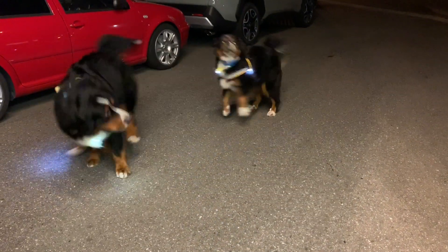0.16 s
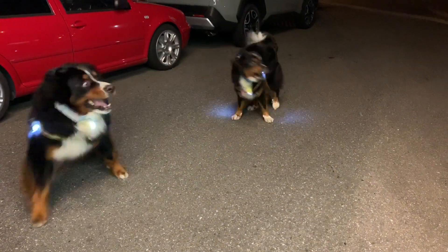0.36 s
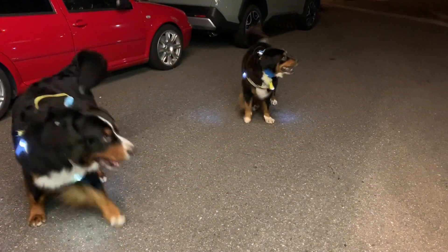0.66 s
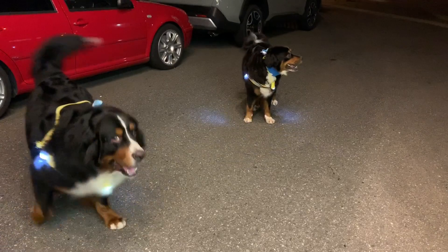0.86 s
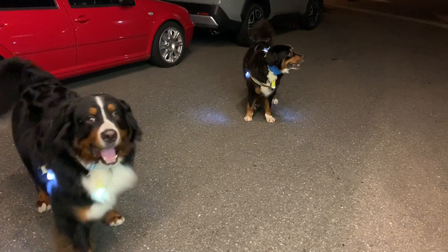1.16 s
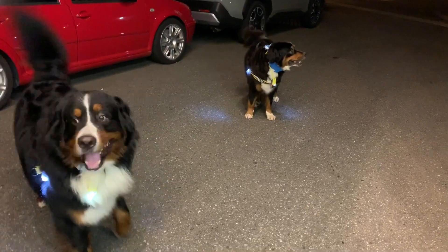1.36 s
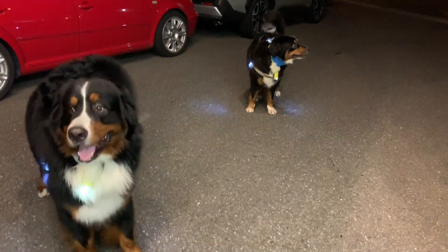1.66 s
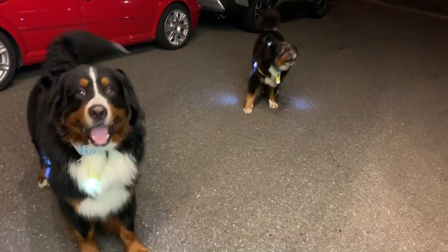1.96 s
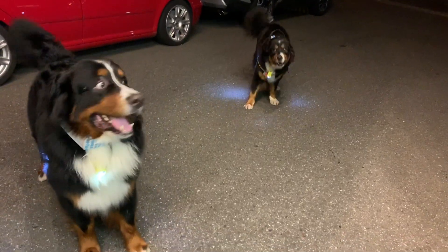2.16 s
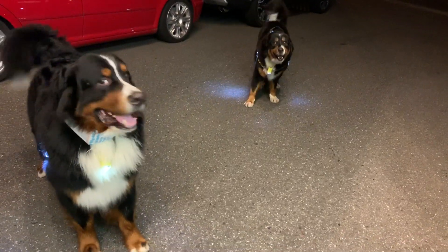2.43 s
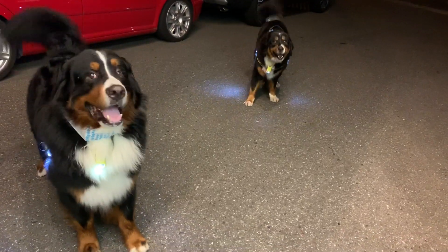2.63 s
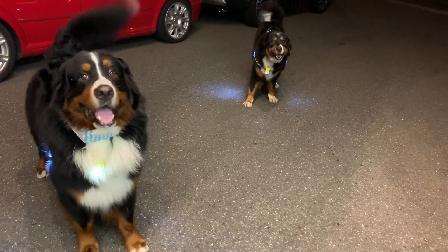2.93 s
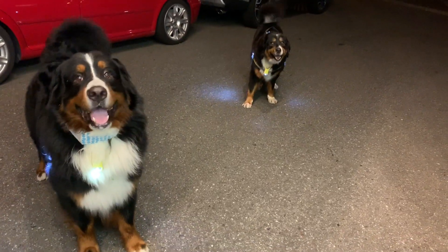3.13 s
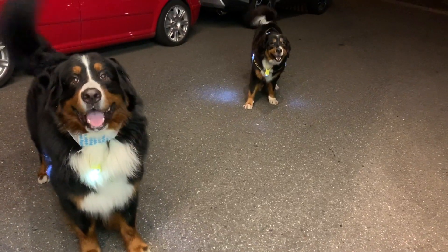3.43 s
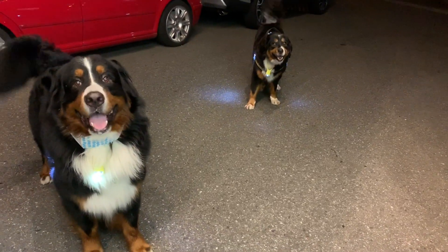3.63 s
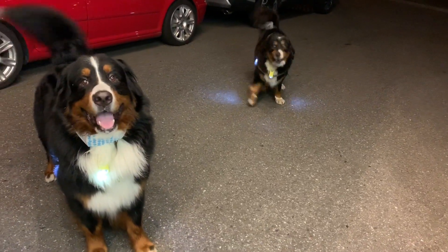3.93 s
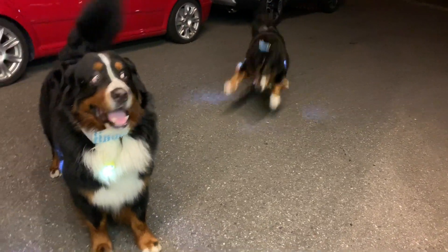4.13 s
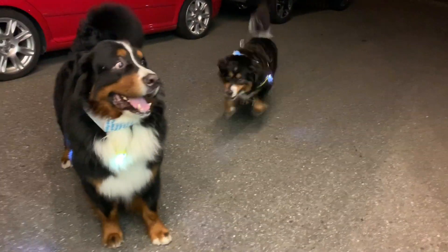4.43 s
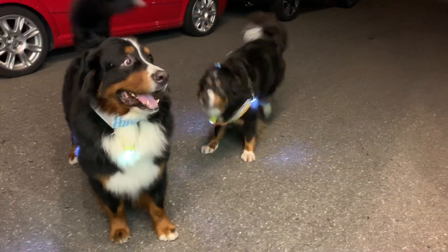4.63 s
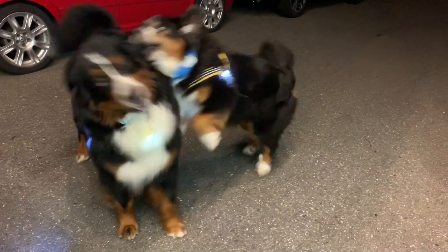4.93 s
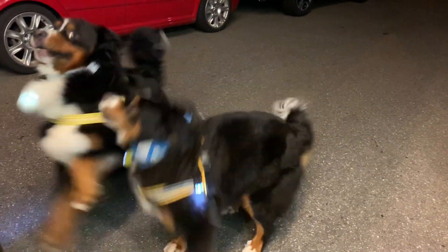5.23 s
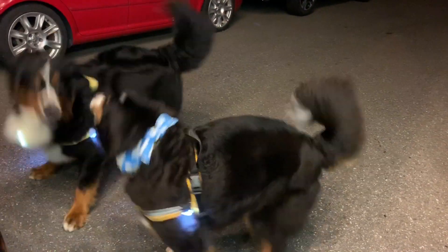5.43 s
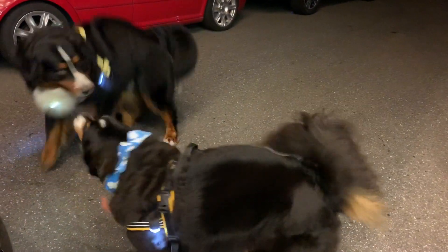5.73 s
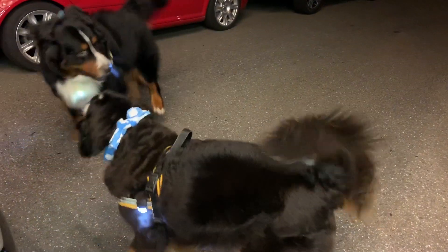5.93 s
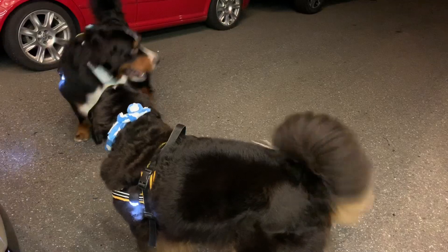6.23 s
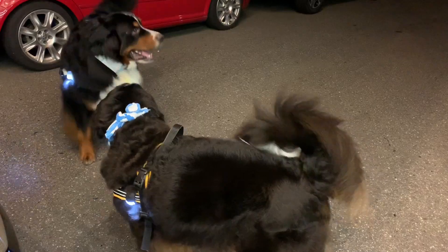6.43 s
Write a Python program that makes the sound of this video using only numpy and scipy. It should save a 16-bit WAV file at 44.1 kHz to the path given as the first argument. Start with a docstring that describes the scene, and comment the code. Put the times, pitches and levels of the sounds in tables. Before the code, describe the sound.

Six rough, abrupt barks from a big dog, close to a stereo microphone on open asphalt. The first two stand alone, with faint collar clinks and breathy puffs between them. Later a playful lunge brings quicker barks, padded landings, claw clicks, broken high whines, hurried panting and grainy rubbing of fur and straps. Each bark slaps off nearby cars and leaves a thin tail over soft traffic rumble.

```python
"""A large dog's six hoarse barks ring out close by, at a playmate in a car park; cars and a far wall answer.
Each bark is two frequency-modulated tones of the vocal folds with noise-filled rasp, shaped by throat and jaw.
Collar tags ring as damped modes, claws and paws strike as decaying noise, and coats and harnesses rub in grains.
Coloured noise makes the panting and the distant traffic; short swept sines make thin whines."""
import sys
import numpy as np
from scipy import signal
from scipy.fft import rfft, irfft, next_fast_len
from scipy.io import wavfile
from scipy.ndimage import uniform_filter1d, minimum_filter1d, map_coordinates

SR = 44100
rng = np.random.default_rng(int(sys.argv[2]) if len(sys.argv) > 2 else 0)


def to_wav(s):
    """Save 16-bit WAV."""
    ch = np.atleast_2d(s).T  # columns
    pcm = np.round(np.clip(ch, -1, 1) * 32767)  # PCM
    wavfile.write(sys.argv[1], SR, pcm.astype(np.int16))


N = 290619

# spectrum of a small hard impact, claw or tag: (frequency [Hz], relative level [dB])
CLAW_SPECTRUM = [(1000, -36.5), (3000, -9.5), (4500, -8.5), (7000, 0), (10000, -18), (14000, -7),
                 (16000, -20.5)]


def amp(db):
    """Level: 20 dB is a tenfold amplitude."""
    return 10 ** (np.asarray(db) / 20)


def unit(x):
    """Normalisation: the root mean square becomes 1."""
    return x / np.sqrt(np.mean(x ** 2) + 1e-20)


def along(points, hz):
    """Logarithmic frequency scale: interpolates (frequency [Hz], value) points."""
    f, v = np.transpose(points)
    return np.interp(np.log(hz + 1), np.log(f + 1), v)


def curves(rows, t):
    """Envelopes: interpolates each column after the time, at the times t."""
    s, *columns = np.transpose(rows)
    return [np.interp(t, s, column) for column in columns]


def wobble(rate, size):
    """Slow random modulation: a smooth curve through rate random knots a second."""
    knots = rng.standard_normal(int(size * rate / SR) + 4)
    return map_coordinates(knots, [np.arange(size) * rate / SR])


def filtered(x, response):
    """Linear filtering: multiplies the spectrum of x by a response of frequency."""
    n = x.shape[-1]
    m = next_fast_len(n + 8192)
    return irfft(rfft(x, m) * response(np.fft.rfftfreq(m, 1 / SR)), m)[..., :n]


def noise(spectrum, size, width=0.83):
    """Spectral colouring: filtered stereo noise of rms 1; width is the ratio of side to mid."""
    mid, side = filtered(rng.standard_normal((2, size)), lambda hz: amp(along(spectrum, hz)))
    return unit(np.array([mid + width * side, mid - width * side]))


def pan(db):
    """Level difference between the channels: left and right gains of constant power."""
    power = (amp(db) + amp(-db)) / 2
    return np.reshape(amp([db / 2, -db / 2]) / np.sqrt(power), (2, -1))


def add(track, s, sound):
    """Superposition: mixes a sound in at s seconds."""
    start = max(round(s * SR), 0)
    part = track[..., start:start + sound.shape[-1]]
    part += sound[..., :part.shape[-1]]


def swells(rows):
    """Amplitude envelope: a rounded swell for each (middle [s], length [s], level [dB]) row."""
    t = np.arange(N) / SR
    return sum(amp(db) * np.exp(-np.abs(2 * (t - s) / length) ** 3) for s, length, db in rows)


def patchy(x):
    """Random gain field: grainy peaks and gaps wander through the noise's spectrum."""
    depth_db = 4.5
    z = signal.stft(x, nperseg=512)[2]
    across_hz = uniform_filter1d(rng.standard_normal(z.shape[1:]), size=3, axis=0)
    field = uniform_filter1d(across_hz, size=5, axis=1)
    return signal.istft(z * amp(depth_db * unit(field)), nperseg=512)[1][:, :x.shape[1]]


def town(rumble_db=3):
    """Broadband noise of many distant sources: traffic rumbles under a faint wash."""
    # rumble level before rumble_db, and wash level: (time [s], level [dB])
    rumble_level = [(0, -40.5), (1.3, -46.5), (2.2, -41.5), (3.2, -42.5), (3.95, -38.5), (4.6, -43),
                    (6.59, -51.5)]
    wash_level = [(0, -47), (1.5, -53.5), (2.6, -51.5), (3.9, -50.5), (5.5, -47), (6.59, -61)]
    # spectra of both: (frequency [Hz], relative level [dB])
    rumble_spectrum = [(12, -40.5), (20, -10.5), (43, 2), (59, -0.5), (72, 0), (108, -10.5), (221, -17.5),
                       (253, -17.5), (300, -28.5), (390, -58.5), (660, -120)]
    wash_spectrum = [(120, -48), (200, -6.5), (451, -9), (494, -6.5), (560, -11), (912, -12), (1690, -21.5),
                     (2550, -24), (5170, -38), (15000, -51.5)]
    t = np.arange(N) / SR
    rumble_gain = amp(curves(rumble_level, t)[0] + rumble_db)
    rumble = rumble_gain * noise(rumble_spectrum, N, width=0.15) * pan(-2.5)
    wash_gain = amp(curves(wash_level, t)[0] + 0.72 * wobble(3, N))
    return rumble + wash_gain * noise(wash_spectrum, N, width=0.82)


def panting():
    """Breath noise through resonances: soft puffs leave a dog's open muzzle."""
    # puffs of breath: (middle [s], length [s], level [dB])
    puffs = [(0.573, 0.095, -41), (0.928, 0.12, -47), (1.271, 0.12, -47.5), (1.635, 0.13, -53),
             (4.806, 0.06, -36.5), (4.929, .07, -33.5), (5.019, 0.12, -35), (5.498, 0.075, -43),
             (5.643, 0.19, -46.5), (6.34, 0.1676, -53.5)]
    # resonances of the open muzzle: (frequency [Hz], relative level [dB])
    muzzle = [(200, -15), (400, 5), (580, -4.5), (800, 2), (970, -4), (1200, 2.5), (1600, -9), (2400, -11),
              (3100, -20), (4000, -25.5), (8000, -41)]
    return swells(puffs) * unit(patchy(noise(muzzle, N, width=0.75)))


def rubbing(grain_db=3, fits_db=3):
    """Friction noise: fur and harness rub in grains, by fits and starts in the tussle."""
    # single rubs, and steady rubbing while the dogs wrestle: (middle [s], length [s], level [dB])
    scuffs = [(.34, 0.16, -48.5), (.53, 0.14, -56), (1.05, 0.078, -59), (4.27, 0.15, -47),
              (4.76, 0.045, -51.5), (5.3, 0.13, -39.5), (5.675, .05, -49), (6.05, 0.27, -59)]
    tussle = [(4.95, 1.31, -51.5)]
    # spectrum of the rubbing: (frequency [Hz], relative level [dB])
    scuff_spectrum = [(1470, -29), (2500, -7), (4240, -5), (5560, -10), (8600, -3), (10500, -26),
                      (12700, -2.5), (16000, -31)]
    strength = swells(scuffs) + swells(tussle) * amp(fits_db * wobble(25, N))
    grains = patchy(noise(scuff_spectrum, N)) * amp(grain_db * wobble(150, N))
    return strength * unit(grains)


def paws(level_db=-7):
    """Soft impact: a yielding pad lands with a brief rise and a low, decaying thud."""
    # landings, before level_db: (time [s], level [dB])
    landings = [(4.285, -22.5), (4.323, -20.5), (4.905, -31), (4.948, -30), (5.027, -28.5), (5.322, -29),
                (5.826, -23)]
    # spectrum of a thud: (frequency [Hz], relative level [dB])
    pad = [(40, -11), (90, -0.5), (200, -9.5), (420, -8), (800, -21), (3000, -49.5)]
    t60_s, rise_s = 0.12, 0.0006
    out, t = np.zeros((2, N)), np.arange(SR // 4) / SR
    for s, db in landings:
        envelope = amp(db + level_db - 60 * t / t60_s) * (1 - np.exp(-t / rise_s))
        add(out, s, envelope * noise(pad, len(t), width=0.19))
    return out


def ticking(level_db=-5):
    """Hard impact: claws and buckles excite abrupt, exponentially decaying noise."""
    # ticks, before level_db: (time [s], level [dB])
    ticks = [(0.4003, -44), (1.6377, -46), (1.726, -49), (4.3959, -29), (4.4485, -35), (4.857, -35),
             (5.0408, -36), (5.454, -29), (6.5141, -50)]
    t60_s = 0.028
    out, t = np.zeros((2, N)), np.arange(SR // 4) / SR
    for s, db in ticks:
        add(out, s, amp(db + level_db - 60 * t / t60_s) * noise(CLAW_SPECTRUM, len(t), width=1.0))
    return out


def tags(level_db=-5.5, click=0.29):
    """Modal vibration: each clink rings the metal tag's damped modes at new strengths."""
    # clinks, before level_db: (time [s], level [dB])
    clinks = [(0.0438, -44), (0.3455, -36.5), (0.3706, -40.5), (0.646, -36), (0.849, -46.5), (0.935, -51),
              (1.336, -49.5), (1.3613, -39.5), (5.965, -49), (6.1826, -40.5)]
    # modes of the tag: (frequency [Hz], mean relative level [dB], decay by 60 dB [s])
    modes = [(6440, -11, 0.17), (7240, -4.5, 0.18), (13240, -10, 0.19), (13400, 3.5, .06), (15710, -19, .1)]
    click_t60_s = 0.011
    out, t = np.zeros((2, N)), np.arange(SR // 2) / SR
    for s, db in clinks:
        ring = 0
        for hz, mode_db, t60 in modes:
            strength_db = mode_db + rng.normal(0, 2, (2, 1))  # drawn for each channel
            ring = ring + amp(strength_db - 60 * t / t60) * np.sin(2 * np.pi * hz * t)
        contact = click * amp(-60 * t / click_t60_s) * noise(CLAW_SPECTRUM, len(t))
        add(out, s, amp(db + level_db) * (ring + contact))
    return out


def whining():
    """Frequency modulation: thin, broken whistles glide and waver as the dog lunges."""
    # whines: (start [s], end [s], first mean pitch [Hz], last mean pitch [Hz], level [dB])
    whines = [(4.451, 4.507, 4350, 4240, -54), (4.525, 4.56, 4200, 4460, -47),
              (4.552, 4.624, 4550, 4780, -43), (4.70, 4.755, 4550, 4180, -46.5),
              (4.764, 4.785, 4250, 4350, -47.5), (4.789, 4.84, 4320, 4170, -47.5),
              (4.886, 4.912, 4130, 4400, -52), (4.897, 5.051, 810, 738, -46.5)]
    waver, flutter_db = .028, 7  # random share of the pitch, random swing of the level
    out = np.zeros((2, N))
    for start, end, first_hz, last_hz, db in whines:
        n = int(max(end - start, .01) * SR)
        hz = np.linspace(first_hz, last_hz, n) * (1 + waver * wobble(300, n))
        swell = unit(np.hanning(n) ** .5 * amp(flutter_db * wobble(100, n)))
        whistle = unit(np.sin(2 * np.pi * np.cumsum(hz) / SR))
        add(out, start, amp(db) * swell * whistle)
    return out


def gesture(row, t):
    """Articulation: the jaw opens and shuts, bending pitch and level, and the voice catches once."""
    (start, length, attack, closing_s, low_hz, high_hz, high_fall, low_db, high_db, rasp_db,
     drift_db, surge_s, period_s, catch_s, catch_db) = row
    low_scoop, high_scoop, low_fall = .25, .17, .16  # shares of pitch: missing at the start, lost at the end
    # climb of the attack, loss as the jaw shuts, dying after the end
    onset_db, closing_db, release_db_per_s = 33.5, 5, 1499
    rasp_open_db = 1.5  # an open mouth lets out more rasp
    low_surge_db, high_surge_db = 3.5, 2.5  # the two tones trade strength to and fro
    catch_width_s = 0.0061  # from the catch's middle to 1/e of its depth
    grunt_db, grunt_s = -23, 0.024  # gain over the rasp's base level, time of its crest
    jaw_lag = 2.1  # opening time in attack times
    age = t - start
    opening = np.clip(1 - age / (jaw_lag * attack), 0, 1) ** 2  # 1 at the start, 0 once open
    closing = np.clip(1 + (age - length) / closing_s, 0, 1)
    shut = closing ** 2
    catch = np.exp(-((age - catch_s) / catch_width_s) ** 2)
    effort_db = (-onset_db * np.clip(1 - age / attack, 0, 1) ** 1.36 - closing_db * shut
                 - catch_db * catch - release_db_per_s * np.maximum(age - length, 0))
    surge = np.cos(2 * np.pi * (age - surge_s) / period_s)
    drift = drift_db * (2 * np.clip(age / length, 0, 1) - 1)
    slack = np.sin(np.pi / 2 * np.clip(age / grunt_s, 0, 2)) + .5 * catch
    return (low_hz * (1 - low_scoop * opening - low_fall * shut),
            high_hz * (1 - high_scoop * opening - high_fall * np.sin(np.pi / 2 * closing) ** 2),
            low_db + effort_db - drift + low_surge_db * surge,
            high_db + effort_db + drift - high_surge_db * surge,
            rasp_db + effort_db - rasp_open_db * (opening + shut),
            amp(rasp_db + grunt_db) * slack)


def fold(hz, rough):
    """Jitter and shimmer: roughness shakes a fold mode's period and swing; gives phase and swing."""
    n, jitter, shimmer_db = len(hz), .055, 4.5
    phase = 2 * np.pi * np.cumsum(hz * (1 + jitter * rough * wobble(324.5, n))) / SR
    return phase, unit(amp(shimmer_db * rough * wobble(210, n)))


def warped(x, stretch):
    """Time scaling: playing x at a changing speed moves its resonances."""
    at = np.cumsum(stretch / np.mean(stretch)) - 1
    return np.array([map_coordinates(row, [at], order=5, mode="mirror") for row in np.atleast_2d(x)])


def bark(row, throat, roughness, delivery, tone_db=-3.0, rasp_db=-1, rasp_low_db=-10, lumps_db=2,
         jaw=.75, overtone_db=-3.5):
    """Nonlinear phonation: two fold modes collide into sum tones and chop the breath into a rasp."""
    # bright hiss that follows each bark's level: (frequency [Hz], relative level [dB])
    hiss_spectrum = [(3000, -42.5), (4100, -42.5), (4700, 1.5), (5200, -10.5), (5900, -7.5), (7500, -4.5),
                     (9200, -11.5), (10500, -41), (13300, -5.5), (16000, -33.5)]
    # level difference of the hiss: (frequency [Hz], left over right [dB])
    hiss_pan = [(4000, 2), (5500, -7.5), (8000, 1), (11000, 0.2)]
    # phase difference between the two channels, before each bark's scale: (frequency [Hz], phase [rad])
    phase_curve = [(450, 0.078), (1000, 1.03), (1500, 0.85), (2300, 2.56), (5000, 1.4), (8000, 0.26),
                   (13000, .05)]
    hiss_db, low_pan_db, high_pan_db, phase_scale = delivery
    start, end = row[0], row[0] + row[1]
    t = np.arange(start - .02, end + .03, 1 / SR)
    n = len(t)
    low_hz, high_hz, low_db, high_db, air_db, slack = gesture(row, t)
    rough = np.interp(t, [start, end], roughness)
    gate = amp(-3000 * np.maximum(start - t, 0))  # steep rise up to the start

    low, low_swing = fold(low_hz, rough)
    high, high_swing = fold(high_hz, rough)
    low_tone = amp(low_db) * low_swing * np.sin(low)
    high_tone = amp(high_db) * high_swing * np.sin(high)
    tones = np.sqrt(2) * (low_tone + high_tone)
    # slack folds sound an octave down, at the start and in the catch
    grunt = slack * low_swing * np.sin(low / 2)

    def mouth(hz):
        """Resonance: the throat's response, weakened below about 1.3 kHz."""
        return amp(along(throat, hz) + along([(1050, rasp_low_db), (1350, 0.0019)], hz))

    def upper(x):
        """Band level: the part above 1250 Hz gets a standard deviation of 1."""
        return x / np.std(filtered(x, lambda hz: hz > 1250))

    # the colliding folds add overtones and sums of the two tones
    sums = (np.sin(low + high) + np.sin(2 * high) + np.sin(2 * low + high)
            + np.sin(low + 2 * high) + np.sin(3 * high))
    overtones = amp(overtone_db) * upper(filtered(high_swing * sums, mouth))
    # turbulence escapes in uneven puffs, once a cycle of the low tone
    puffs = (1 + 0.49 * np.cos(low)) * amp(lumps_db * wobble(239.3, n))
    breath = filtered(patchy(puffs * rng.standard_normal((1, n))), mouth)
    # its resonances rise and fall with the jaw, like the high tone
    stretch = np.maximum(high_hz / high_hz.max(), .75) ** jaw
    rasp = upper(warped(breath, stretch))
    edge = amp(rasp_db) * (np.sqrt(1 - rough) * overtones + np.sqrt(rough) * rasp)
    voice = gate * (amp(tone_db) * tones + grunt + amp(air_db) * edge)
    hiss = gate * amp(air_db + hiss_db) * unit(puffs * patchy(noise(hiss_spectrum, n, width=0.13)))

    voice_pan = [(600, low_pan_db), (950, high_pan_db), (1500, 4.3), (3000, 0.3)]  # (Hz, left over right dB)

    def phase_shift(hz):
        """Phase difference between the two channels, scaled and signed for each bark."""
        return np.exp(.5j * phase_scale * along(phase_curve, hz) * np.array([[1], [-1]]))

    placed_voice = filtered(voice, lambda hz: pan(along(voice_pan, hz)) * phase_shift(hz))
    placed_hiss = filtered(hiss, lambda hz: pan(along(hiss_pan, hz)) * phase_shift(hz))
    return t[0], placed_voice + placed_hiss


def barking():
    """Source and filter: each bark's fold motion meets its own throat."""
    # bark gestures, base levels and pitches before the jaw and effort bend them:
    # (start [s], length [s], attack [s], jaw closing [s], low tone [Hz], high tone [Hz],
    #  fall of the high tone [share], low tone [dB], high tone [dB], rasp [dB],
    #  drift from low to high tone [dB], first surge after the start [s], time between surges [s],
    #  catch in the voice after the start [s], depth of the catch [dB])
    gestures = [(0.057, 0.16, 0.042, 0.064, 559.1, 948.7, 0.14, -13.5, -10.5, -12.5, 1.5, .047, .043, 0.14, 5),
                (1.927, .13, 0.049, 0.064, 620, 1074, 0.19, -12, -10.5, -9.5, 4, 0.031, .045, 0.1, 3),
                (4.002, .128, 0.042, 0.038, 598.7, 1057, .15, -15.5, -6, -7.5, 8.5, 0.048, 0.042, 0.093, 10.5),
                (4.533, .178, 0.059, .034, 569, 1055, .52, -14.5, -8, -12.5, 3.5, 0.071, 0.048, .133, 17.5),
                (5.085, 0.15, .017, .04, 576.2, 945, .09, -7, -15.5, -13, 1.5, .018, .05, 0.081, 5.5),
                (5.775, 0.13, 0.039, 0.055, 552, 956.3, 0.19, -10, -12, -18, 4, .045, .04, 0.098, 6.5)]
    # throat and mouth of each bark, a list of: (frequency [Hz], relative level per Hz [dB])
    throats = [
        [(150, -67), (250, -29), (407, -20.5), (519, 4), (662, -3), (938, 0.5), (1180, -17.5), (1380, -19),
         (1720, -23.5), (1950, -24), (2240, -30), (2670, -35.5), (4000, -56.5), (5200, -63.5), (8800, -120)],
        [(150, -82), (250, -29), (326, -15), (694, 9.5), (896, -3.5), (983, 9), (1340, -7.5), (1840, -8),
         (2040, -25.5), (2510, -17), (3480, -41.5), (3770, -64.5), (4000, -33.5), (5200, -76.5), (8800, -120)],
        [(150, -57), (250, -47.5), (330, -25.5), (468, -16.5), (583, 4), (770, -13.5), (1040, 2), (1240, -30),
         (1680, -18.5), (2370, -33.5), (2600, -33.5), (3100, -54.5), (4000, -49), (5200, -83), (8800, -120)],
        [(150, -39.5), (250, -24.5), (426, -23.5), (507, -8.5), (678, -13.5), (816, -6), (896, -21.5),
         (1040, -5), (1300, -36.5), (1800, -23), (2700, -36.5), (2960, -48), (4000, -47.5), (5200, -58.5),
         (8800, -120)],
        [(150, -64), (250, -27), (468, -23.5), (570, -1), (816, -13), (917, -2.5), (1160, -15.5), (1550, -30),
         (1820, -27), (2570, -39), (3210, -40), (3820, -82), (4000, -103), (5200, -133), (8800, -120)],
        [(150, -68.5), (250, -38), (431, -2.5), (507, -7), (597, 4), (710, -30), (949, -0.5), (1210, -29.5),
         (1440, -22), (1660, -33), (2860, -43.5), (3480, -67), (4000, -46.5), (5200, -86.5), (8800, -120)],
    ]
    # roughness of each bark: (at its start [0-1], at its end [0-1])
    roughnesses = [(.45, .3), (.55, .55), (.65, .06), (.6, .1), (.2, .35), (.35, .35)]
    # (hiss over the rasp's level curve [dB], low tone left over right [dB],
    #  high tone left over right [dB], scale and sign of the phase difference [factor])
    deliveries = [(-19, -5.5, 0.5, -0.9), (-20, -4.5, 6, -0.71), (-18, -6.5, 4, -0.79),
                  (-19.5, 1.5, 6.5, -0.94), (-22.5, -3.5, 5.5, 1.73), (-24.5, 2, 5, 1.53)]
    out = np.zeros((2, N))
    for row, throat, roughness, delivery in zip(gestures, throats, roughnesses, deliveries):
        add(out, *bark(row, throat, roughness, delivery))
    return out


def reverb(x, decay, delay):
    """Diffuse reverberation: convolution with noise whose frequencies die at their own speeds."""
    hz, t, z = signal.stft(rng.standard_normal((2, SR)), SR, nperseg=256)
    decayed = z * amp(-60 * t / along(decay, hz)[:, None])
    mid, side = signal.istft(decayed, SR, nperseg=256)[1]
    tail = np.array([mid + 0.43 * side, mid - 1.37 * side])
    out = np.zeros((2, N))
    add(out, delay, signal.fftconvolve(x, tail / np.linalg.norm(tail[0]), axes=1))
    return out


def panel_slaps(barks):
    """Specular reflection: the nearest car bodies return delayed copies of the barks."""
    # reflections: (delay [s], left level [dB], right level [dB])
    panels = [(.0043, -18, -25.5), (.019, -30, -22), (.031, -23.5, -11.5), (0.045, -20, -33)]
    out = np.zeros((2, N))
    for delay, left_db, right_db in panels:
        add(out, delay, amp([[left_db], [right_db]]) * barks)
    return out


def wall_echo(barks, level_db=-33):
    """Discrete echo: a far wall returns the barks late and duller."""
    loss = [(600, 0), (1000, -3.5), (1600, -2.5), (5000, -24.0)]  # (Hz, dB)
    out = np.zeros((2, N))
    add(out, .15, amp(level_db) * filtered(barks, lambda hz: amp(along(loss, hz))))
    return out


def scene(cars_db=-16, yard_db=-24):
    """Superposition: direct sound, the cars' quick answer, the yard's tail and a far wall's echo."""
    # decay of the parked cars' answer and of the yard: (frequency [Hz], decay by 60 dB [s])
    car_decay = [(200, 0.23), (600, 0.18), (2000, .2), (7000, 0.11), (14000, 0.31)]
    yard_decay = [(200, 0.59), (600, 0.69), (1200, 0.78), (3000, 0.86), (7000, 0.79), (14000, 0.28)]
    barks = barking()
    near = barks + whining() + tags() + ticking() + paws() + rubbing() + panting()
    cars = amp(cars_db) * reverb(barks, car_decay, .02)
    yard = amp(yard_db) * reverb(near, yard_decay, 0.027)
    return near + cars + yard + town() + panel_slaps(barks) + wall_echo(barks)


def record(dry):
    """Peak limiting and band limiting: gain dips around peaks, and the highest treble is removed."""
    ceiling, hold, top_hz = .95, int(.006 * SR), 15900  # full scale 1, samples, Hz
    needed = ceiling / np.maximum(np.abs(dry).max(axis=0), ceiling)
    gain = uniform_filter1d(minimum_filter1d(needed, hold), hold)
    return filtered(dry * gain, lambda hz: hz < top_hz)


dry = scene()
out = record(dry)
to_wav(out)
```